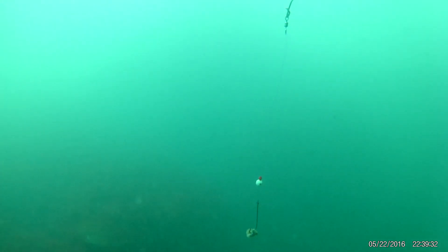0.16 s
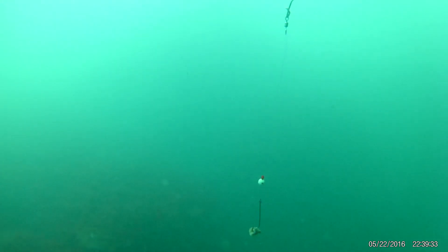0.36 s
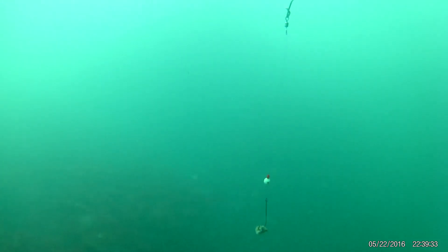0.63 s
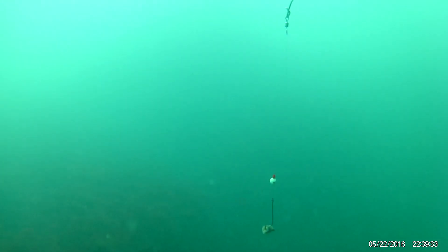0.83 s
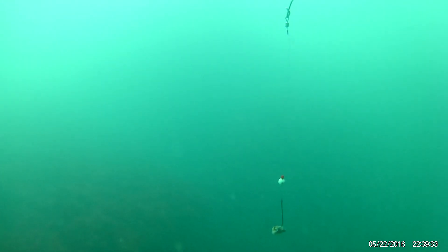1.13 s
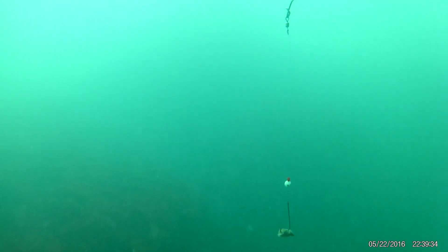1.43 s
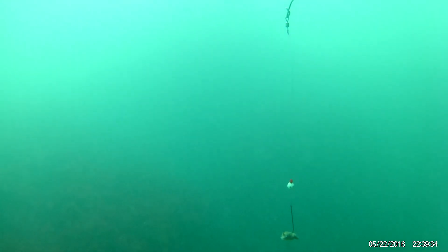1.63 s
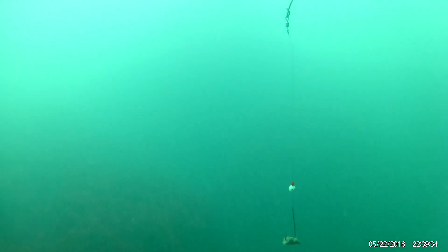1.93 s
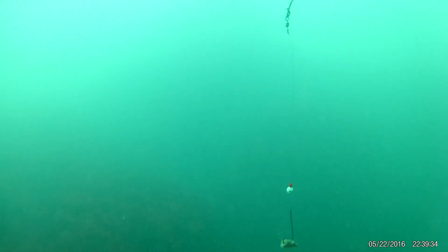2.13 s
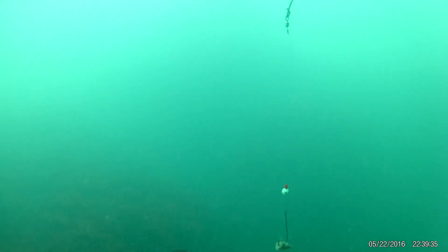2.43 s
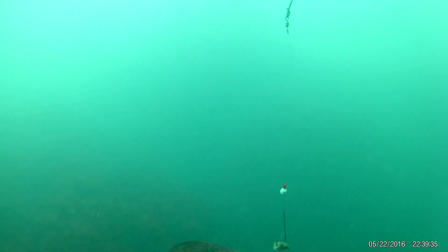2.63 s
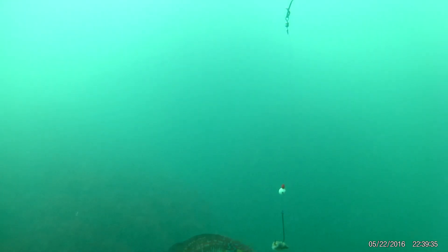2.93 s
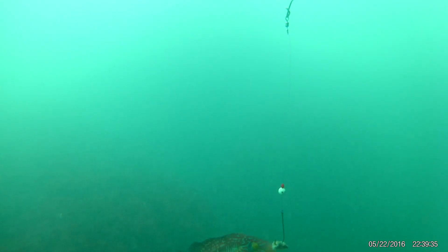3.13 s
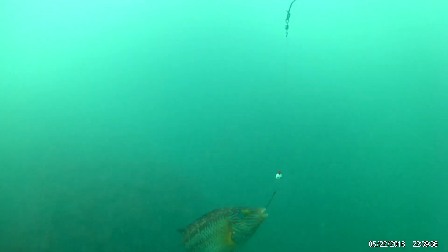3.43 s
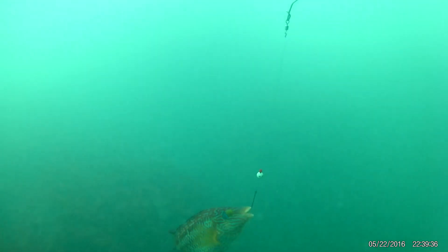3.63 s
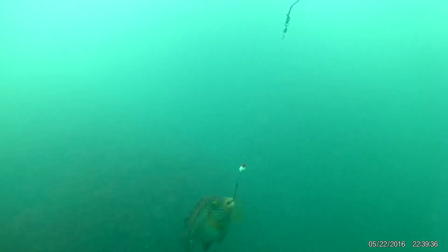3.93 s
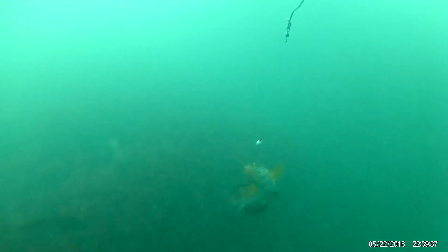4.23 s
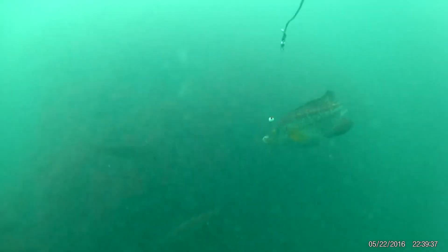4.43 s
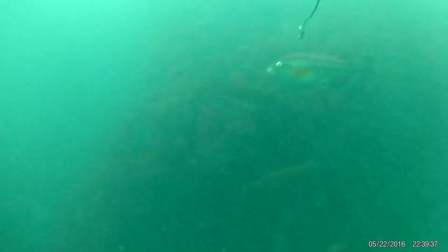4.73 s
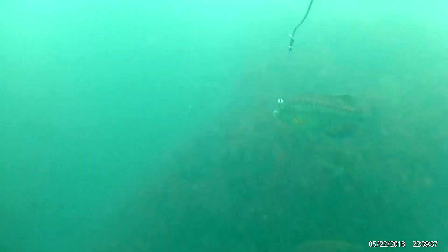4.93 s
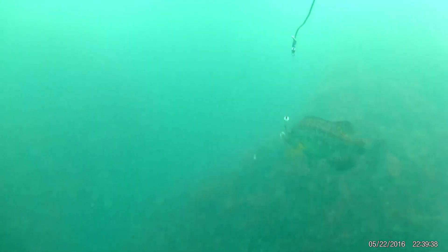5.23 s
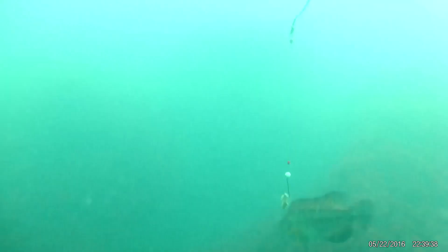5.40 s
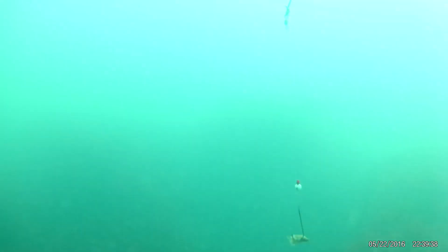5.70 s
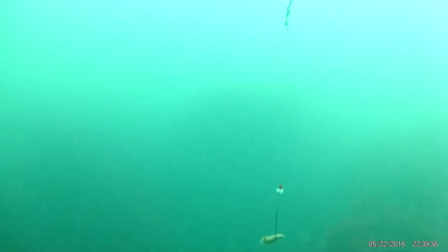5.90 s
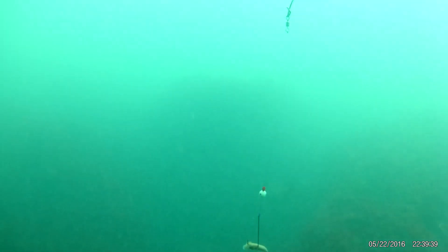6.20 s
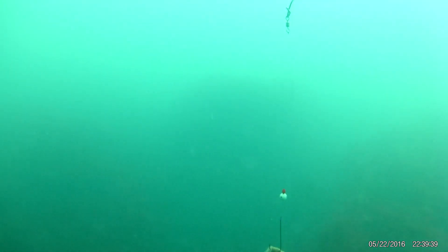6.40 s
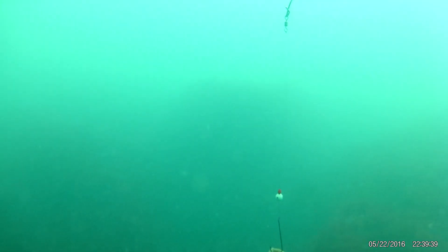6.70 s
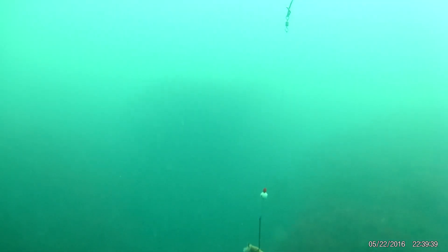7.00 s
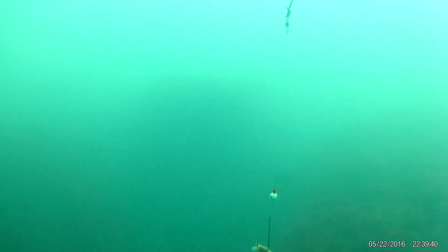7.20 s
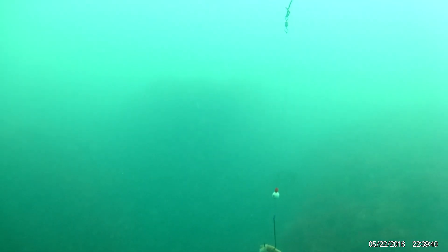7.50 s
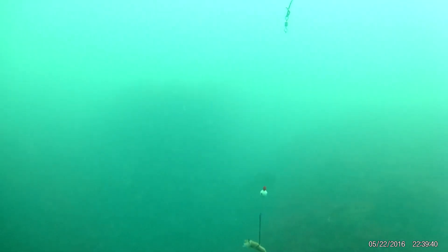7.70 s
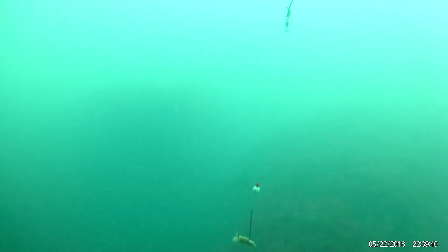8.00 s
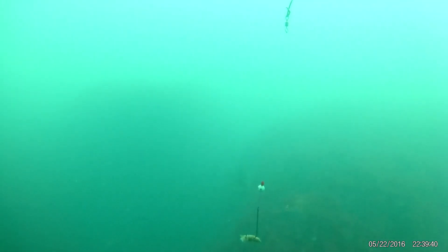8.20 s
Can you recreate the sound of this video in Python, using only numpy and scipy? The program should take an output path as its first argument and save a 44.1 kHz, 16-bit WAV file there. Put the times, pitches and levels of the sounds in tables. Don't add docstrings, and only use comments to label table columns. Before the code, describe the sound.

Steady dull water drone; a fish jerks the line with a loud boomy knock and metallic rattle, then thuds, hollow pops and line squeaks, then calm.

```python
import sys
import numpy as np
from scipy import signal
from scipy.fft import rfft, irfft, next_fast_len
from scipy.io import wavfile
from scipy.ndimage import uniform_filter1d

SR = 44100
rng = np.random.default_rng(int(sys.argv[2]) if len(sys.argv) > 2 else 0)


def invert_db(level):
    return 10 ** (np.asarray(level, dtype=float) / 20)


def digitize_waveform(pressure):
    field = np.atleast_2d(pressure).T
    bounded = np.clip(field, -1, 1)
    quanta = np.round(bounded * 32767).astype(np.int16)
    wavfile.write(sys.argv[1], SR, quanta)


N = 368224

# (frequency [Hz], density [dB per Hz])
WATER_SPECTRUM = [(12, -52), (20, -22.5), (72, -3.5), (94, -7.5), (117, -13), (146, -14), (205, -9.5),
                  (250, -7.5), (439, -7), (534, -2.5), (915, -23), (1090, -35.5), (1290, -25),
                  (1610, -37.5), (7000, -55), (9100, -84.5), (15400, -120)]
# (frequency [Hz], width [Hz], boost [dB])
WATER_BOOSTS = [(76, 25, 2.5), (543.3, 27, 4), (621, 53, 7), (1262, 110, 4.5), (2750, 400, 3.5)]
# (time [s], level [dB])
STIRS = [
    (3.3, 2),
    (4.05, 1.5),
    (4.4, 1.5),
    (4.9, 2),
]
# (time [s], peak [dB], pitch [Hz])
TICKS = [(0.059, -58, 2830), (0.326, -62, 3100), (0.9625, -62, 3200), (1.5373, -52.5, 2750),
         (1.5663, -64, 2580), (2.414, -57.5, 2600), (2.556, -55, 2830), (3.8092, -51.5, 1870),
         (3.915, -47.5, 1890), (5.3712, -64.5, 1873), (5.4106, -57, 2260), (5.6095, -41, 3000),
         (5.7492, -60, 1870), (6.5484, -58, 2850), (6.6094, -51, 1920)]
# (time [s], peak [dB], pitch [Hz])
TAPS = [(0.344, -25, 589), (0.359, -27.5, 601.4), (0.537, -32.5, 538), (1.002, -41, 514),
        (1.136, -32.5, 550), (2.546, -34, 548), (3.77, -45, 628), (5.735, -34, 582), (6.317, -37.5, 608),
        (6.434, -35.5, 527), (7.521, -26, 554), (7.943, -38.5, 602)]
# (time [s], peak [dB], pitch [Hz], t60 [s])
BLIPS = [
    (1.452, -49, 800, 0.1),
    (3.769, -40, 753, 0.089),
    (6.262, -46, 872, 0.1),
    (1.46, -52, 1380, 0.12),
]
# (start [s], hold [s], rattle level [dB], rub level [dB])
PULLS = [(3.235, 0.11, -32, -10.5), (3.372, .045, -50, -26), (4.078, .135, -66, -32),
         (4.24, .055, -58, -40), (4.296, 0.1, -40, -20), (4.4, 0.051, -45.5, -16.5),
         (4.655, .02, -68, -27.5), (4.718, 0.13, -62.5, -21.5), (4.911, 0.047, -68, -28),
         (5.435, 0.028, -77, -32), (5.514, .015, -60.5, -35), (5.598, .02, -59.5, -36.5),
         (5.72, .045, -60, -42), (5.795, 0.016, -61, -45.5), (5.922, .12, -66, -37.5)]
# (frequency [Hz], density [dB per Hz])
RATTLE_SPECTRUM = [(530, -42.5), (900, 1.5), (1700, -9.5), (2360, -9.5), (3100, -13.5), (3480, -18.5),
                   (3830, -14), (4960, -24.5), (6350, -20.5), (7400, -35.5), (7850, -55), (8830, -28.5),
                   (15000, -49)]
# (frequency [Hz], width [Hz], level [dB])
RATTLE_MODES = [(1870, 78, 0), (2267, 270, -0.5), (2877, 100, -1), (3150, 31, -2.5), (3810, 110, -5.5),
                (4476, 90, -2), (4220, 47, -6.5), (4370, 36, -8), (5540, 51, -13.5), (5940, 290, -15.5)]
# (time [s], push level [dB], rig level [dB], housing level [dB], share of full ring time [0-1])
KNOCKS = [(3.236, 3, -5, 3.5, 0.84), (3.253, 2, -10, 1.5, 0.88), (3.284, 2.5, -24.5, -1.5, 0.93),
          (3.896, -24.5, -39, -33, 0.83), (4.302, -6, -23, -16, 0.17), (4.312, -22, -11.5, -12, 0.53),
          (4.321, -26, -15, -11.5, 0.32), (4.333, -5, -44, -12.5, 0.43), (4.377, -6, -21, -18.5, 0.3),
          (4.407, -48, -55, -3, 0.46), (4.427, -11, -26, -10, 0.8), (4.444, -20, -39, -8.5, 0.35),
          (4.653, -18, -37.5, -48, 0.8), (4.667, -8.5, -32, -27, 0.6), (4.675, -12, -17, -40, 0.05),
          (4.723, -19, -42.5, -15.5, 0.73), (4.737, -12, -22.5, -13, 0.34), (4.804, -22, -30.5, -17, 0.99),
          (4.963, -15, -23.5, -34, 0.68), (5.349, -23.5, -61, -46, 0.7), (5.448, -19.5, -27, -27, 0.98)]
# (frequency [Hz], level [dB], t60 [s])
PUSH_MODES = [(51.66, -9.5, 0.68), (79.6, -8, 0.12), (104.2, -5, 0.26)]
# (frequency [Hz], level [dB], t60 [s])
RIG_MODES = [(190.1, -1, 0.32), (233, 7.5, 0.089), (296, 0.5, .12), (370.4, -1, 0.27)]
# (frequency [Hz], level [dB], t60 [s])
HOUSING_MODES = [(545.5, -12.5, 0.23), (610, -5.5, 0.27), (647, -17, 0.093), (723, -22.5, 0.32)]
# (frequency [Hz], level [dB], t60 [s])
LID_MODES = [(809, 3.5, 0.084), (903, -6.5, 0.17), (1020, -5, 0.11), (1198, -4, 0.11), (1414, -6.5, 0.096)]
# (time [s], peak [dB], brightness above 3400 Hz [dB])
STRIKES = [(3.2433, -18, 5.5), (3.2493, -25, 1.5), (3.2627, -16, 11), (3.2852, -17.5, 11),
           (3.3166, -25, 15.5), (3.3361, -21.5, 10), (3.377, -39, 5.5), (3.4343, -48, 2),
           (3.4668, -48.5, 3), (3.304, -29, 8), (4.2564, -50.5, -5.5), (4.3013, -38, -4), (4.35, -40, 7),
           (4.415, -31, 10), (4.3811, -31.5, 13), (4.403, -26.5, 13), (4.4449, -40.5, -11), (4.666, -46, 6),
           (4.722, -41.5, 1.5), (4.7363, -35, 0.1), (4.7732, -51, -9), (4.7996, -43, -11),
           (4.8525, -54, -7), (4.652, -52, 3), (5.3712, -50, 10), (5.4455, -51, -2), (5.5867, -48, 2),
           (5.6096, -47, 12), (5.7498, -43, 2.5), (5.7244, -55, 7)]
# (time [s], rate [Hz], level [dB], loss [dB per s])
SWAYS = [
    (3.38, 48.8, -32.5, 78),
    (4.44, 48.6, -13, 281.5),
    (4.74, 38.4, -26.5, 221.5),
    (4.985, 52.2, -40, 149),
    (5.17, 45.2, -40, 42),
    (5.48, 50, -45, 35),
]
# (start [s], length [s], first rate [slips per s, or Hz of the
# overtone], last rate [same], level [dB])
SLIPS = [
    (4.75, .105, 640, 545, -37),
    (4.835, .125, 435, 300, -22.5),
    (4.078, .148, 95, 101, -47.5),
    (5.045, .15, 203, 192, -32.5),
    (5.14, .22, 146, 124, -43),
    (4.05, .11, 189, 194, -46),
    (4.25, .045, 100, 101, -40),
    (4.79, 0.047, 1110, 1100, -27),
]
# (level [dB], ..)
SLIP_PARTIAL_DB = (1.4, -27, -28)
# (frequency [Hz], width [Hz], boost [dB])
SLIP_BOOSTS = [(610, 140, 21.5), (1300, 800, -21.5), (3400, 1400, -20)]
# (level [dB], ..)
SLIP_CLICK_DB = (-66.5, -67, -64)
# (frequency [Hz], width [Hz], level [dB])
SWIVEL_MODES = [(1890, 140, 8.5), (2280, 180, 8), (2830, 180, -0.5), (3420, 240, -9.5), (3900, 300, -7.5)]
# (time [s], peak [dB], pitch [Hz], t60 [s])
SHOVES = [
    (4.3, -3.5, 98, 0.061),
    (4.331, -4, 60, 0.12),
    (4.651, -11.5, 58.4, 0.063),
    (4.735, -13.5, 56.5, 0.056),
]
# (time [s], peak [dB], pitch [Hz], t60 [s])
POPS = [
    (4.307, -10, 280, 0.079),
    (4.666, -15.5, 203.6, 0.084),
    (4.803, -18, 220, 0.032),
    (4.964, -6, 242, 0.07),
    (7.896, -36.5, 259.5, 0.18),
    (4.316, -27, 1080, 0.12),
    (4.425, -24, 900, 0.08),
]
# (frequency [Hz], density [dB per Hz])
HISS_SPECTRUM = [(3000, -5.5), (8000, -3.5), (12000, -3), (14000, -2.5), (15600, -0.5), (15900, -42)]
# (time [s], ..)
DROPOUTS = [.13, .445, .481, .608, .632, .678, 1.42, 1.632, 1.884, 2.972, 3.084, 3.401, 3.511, 3.719, 4.215,
            4.483, 4.694, 4.919, 5.09, 5.167, 5.709, 5.763, 5.816, 6.242, 6.797, 7.053, 7.18, 7.309, 7.757,
            8.325]

SLIP_RELEASE_DB_PER_S = 1499


def rms_one(x):
    return x / np.sqrt(np.mean(x ** 2) + 1e-20)


def drift(rate):
    hop = 40
    r = np.exp(-2 * np.pi * rate * hop / SR)
    noise = rng.standard_normal(N // hop + 2002)
    slow = signal.lfilter([1], [1, -2 * r, r * r], noise)[2000:]
    return np.interp(np.arange(N) / hop, np.arange(len(slow)), rms_one(slow))


def shaped(x, spectrum, peaks=()):
    size = next_fast_len(N)
    hz = np.maximum(np.arange(size // 2 + 1) * SR / size, 1)
    corner_hz, corner_db = np.transpose(spectrum)
    level_db = np.interp(np.log(hz), np.log(corner_hz), corner_db)
    for top_hz, width, boost_db in peaks:
        level_db = level_db + resonant_boost(hz, top_hz, width, boost_db)
    return rms_one(irfft(rfft(x, size) * invert_db(level_db), size)[:N])


def resonant_boost(hz, top_hz, width, boost_db):
    return boost_db / (1 + (2 * (hz - top_hz) / width) ** 2)


def filtered(x, order, hz, kind):
    return signal.sosfiltfilt(signal.butter(order, hz, kind, fs=SR, output="sos"), x)


def resonate(x, hz, width):
    r = np.exp(-np.pi * width / SR)
    feedback = [1, -2 * r * np.cos(2 * np.pi * hz / SR), r * r]
    return signal.lfilter(np.array([1, 0, -1]) * (1 - r * r) / 2, feedback, x)


def ringing(hz, t60, contact_s):
    t = np.arange(round(1.3 * t60 * SR)) / SR
    onset = (1 - np.exp(-t / contact_s)) ** 2
    return -np.sin(2 * np.pi * hz * t) * invert_db(-60 * t / t60) * onset


def add(out, s, sound):
    i = round(s * SR)
    out[i:i + len(sound)] += sound[:N - i]


def single_rings(events):
    out = np.zeros(N)
    for s, peak_db, hz, t60 in events:
        add(out, s, invert_db(peak_db) * ringing(hz, t60, contact_s=0.0016))
    return out


def held(start, hold, attack, sag_db, release_db):
    out = np.zeros(N)
    end = min(round((start + hold + 60 / release_db) * SR), N)
    span = slice(round(start * SR), end)
    t = np.arange(span.stop - span.start) / SR
    loss_db = sag_db * np.minimum(t, hold) + release_db * np.maximum(t - hold, 0)
    out[span] = np.minimum(t / attack, 1) * invert_db(-loss_db)
    return out


def unsteady(gate, hz, partial_db, wobble, shake_db):
    out, live = np.zeros(N), gate > 0
    phase = 2 * np.pi * np.cumsum((hz * (1 + wobble * drift(36)))[live]) / SR
    for k, level_db in enumerate(partial_db, 1):
        strength = invert_db((level_db + shake_db * drift(35))[live])
        out[live] += strength * np.sin(k * phase)
    return np.sqrt(2) * gate * out


def water():
    still_db, rise_s, settle_s = -44.0, 0.21, 0.35
    noise = shaped(rng.standard_normal(N), WATER_SPECTRUM, WATER_BOOSTS)
    bass = filtered(noise, 2, 160, "low")
    hiss = filtered(noise, 2, 1000, "high")
    hum = noise - bass - hiss
    out = 0
    for part, swell_db in ((bass, 1.5), (hum, 1.3), (hiss, 0.8)):
        out = out + part * invert_db(swell_db * (drift(2.2) + drift(4.9)))
    level_db = still_db
    for s, stir_db in STIRS:
        since = np.maximum(np.arange(N) / SR - s, 0)
        level_db = level_db + 2 * stir_db * (1 - np.exp(-since / rise_s)) * np.exp(-since / settle_s)
    return invert_db(level_db) * rms_one(out)


def swivel_ticks():
    out = np.zeros(N)
    t = np.arange(900) / SR
    for s, peak_db, hz in TICKS:
        burst = rng.standard_normal(len(t)) * invert_db(-60 * t / 0.037)
        add(out, s, invert_db(peak_db + 13.5) * resonate(resonate(burst, hz, 450), hz, 450))
    return out


def housing_taps():
    out = np.zeros(N)
    for s, peak_db, hz in TAPS:
        add(out, s, invert_db(peak_db) * ringing(hz, 0.13, contact_s=0.0022))
    return out


def bubble_blips():
    return single_rings(BLIPS)


def swivel_rattle():
    sizes = invert_db(3.2 * np.minimum(rng.exponential(1, N), 4)) * rng.choice([-1, 1], N)
    clicks = sizes * (rng.random(N) < 3000 * invert_db(5 * drift(60)) / SR)
    dealt = rng.integers(0, 3, N)
    rings = 0
    for k, (hz, width, level_db) in enumerate(RATTLE_MODES):
        own_clicks = clicks * (dealt == k % 3) + 1e-18
        rings = rings + invert_db(level_db) * rms_one(resonate(own_clicks, hz, 1.212 * width))
    return rms_one(shaped(clicks, RATTLE_SPECTRUM) + invert_db(5.0) * shaped(rings, RATTLE_SPECTRUM))


def pulls(rattle):
    attack_s, sag_db_per_s = 0.008, 38.5
    rough = rng.standard_normal(N)
    rub = rms_one(0.7 * resonate(rough, 546, 33) - resonate(rough, 606.6, 22))
    out = np.zeros(N)
    for s, hold, rattle_db, rub_db in PULLS:
        out += invert_db(rattle_db - 5) * held(s, hold, attack_s, sag_db_per_s, 900) * rattle
        out += invert_db(rub_db - 8) * held(s, hold, attack_s, sag_db_per_s, 351) * rub
    return out


def knocks():
    out = np.zeros(N)
    groups = ((PUSH_MODES, 0.0015), (RIG_MODES, 0.001), (HOUSING_MODES, 0.001), (LID_MODES, 0.0008))
    for s, push_db, rig_db, housing_db, share in KNOCKS:
        lid_db = housing_db - 4.0 - 21.0 * share
        for (modes, contact_s), blow_db in zip(groups, (push_db, rig_db, housing_db, lid_db)):
            for hz, mode_db, t60 in modes:
                ring = ringing(hz, t60 * np.clip(share, 0.05, 1.5), contact_s)
                chance_db = 1.5 * rng.standard_normal()
                add(out, s, invert_db(blow_db + mode_db - 3 + chance_db) * ring)
    return out


def strikes(rattle):
    bright = filtered(rattle, 4, 3400, "high")
    out, t = np.zeros(N), np.arange(round(0.15 * SR)) / SR
    for s, peak_db, bright_db in STRIKES:
        t60 = max(0.08 - 0.01 * bright_db, 0.02)
        start = round(s * SR)
        span = slice(start, start + len(t))
        flare = invert_db(peak_db - 7 - 60 * t / t60) * (1 - np.exp(-t / 0.0015))
        even = np.sqrt(np.sum(flare ** 2) / np.sum((flare * rattle[span]) ** 2))
        add(out, s, even * flare * (rattle[span] + (invert_db(bright_db) - 1) * bright[span]))
    return out


def swaying():
    out = np.zeros(N)
    for s, hz, level_db, loss_db in SWAYS:
        gate = held(s, 0.45, 0.011, loss_db, 600)
        out += unsteady(gate, hz, [level_db], wobble=0.025, shake_db=4.5)
    return out


def slip_rate(start, length, first_hz, last_hz):
    left = np.clip(1 - (np.arange(N) / SR - start) / length, 0, 1)
    return last_hz + (first_hz - last_hz) * left ** 1.8


def line_squeaks():
    out = np.zeros(N)
    for start, length, first_hz, last_hz, level_db in SLIPS:
        hz = slip_rate(start, length, first_hz, last_hz)
        partial_db = []
        for k, own_db in enumerate(SLIP_PARTIAL_DB, 1):
            boost_db = sum(resonant_boost(k * hz, *boost) for boost in SLIP_BOOSTS)
            partial_db.append(level_db + own_db + boost_db)
        partial_db[0] = partial_db[0] + 30.5 * np.log2(hz / first_hz)
        gate = held(start, length, 0.023, 0, SLIP_RELEASE_DB_PER_S)
        out += unsteady(gate, hz, partial_db, wobble=0.014, shake_db=4.5)
    return out


def slip_clicks():
    scratch_s = 0.005
    out = np.zeros(N)
    for (start, length, first_hz, last_hz, _), level_db in zip(SLIPS, SLIP_CLICK_DB):
        hz = slip_rate(start, length, first_hz, last_hz)
        cycles = np.cumsum(hz * (1 + 0.022 * drift(66))) / SR
        clicks = np.diff(np.floor(cycles), prepend=0) * invert_db(2.3 * rng.standard_normal(N))
        decay = signal.lfilter([1], [1, -np.exp(-1 / (scratch_s * SR))], clicks)
        scratch = decay * rng.standard_normal(N)
        rings = 0
        for mode_hz, width, mode_db in SWIVEL_MODES:
            ring = resonate(resonate(scratch, mode_hz, width), mode_hz, 2 * width)
            rings = rings + invert_db(mode_db) * ring
        gate = held(start, length, 0.008, 5, SLIP_RELEASE_DB_PER_S)
        loudness = np.sqrt(np.mean(rings[gate > 0.5] ** 2))
        out += gate * invert_db(level_db + 2.2 * drift(25)) * rings / loudness
    return out


def water_shoves():
    return single_rings(SHOVES)


def pops_and_lid_rings():
    return single_rings(POPS)


def scene():
    rattle = swivel_rattle()
    around = water() + swivel_ticks() + housing_taps() + bubble_blips()
    jerking = pulls(rattle) + knocks() + strikes(rattle) + swaying()
    slipping = line_squeaks() + slip_clicks()
    return (around + jerking + slipping + water_shoves() + pops_and_lid_rings())[None]


def thinned_treble(x):
    length_s, fade_s = 0.014, 0.016
    treble = filtered(x[0], 4, 2300, "high")
    out = x.copy()
    for s in DROPOUTS:
        reach = (length_s + fade_s) / 2
        span = slice(round((s - reach) * SR), round((s + reach) * SR))
        size = len(treble[span])
        lines = rfft(treble[span] * signal.windows.tukey(size, fade_s / (length_s + fade_s)))
        prominence = abs(lines) / uniform_filter1d(abs(lines), size=40)
        hz = np.linspace(0, SR / 2, len(lines))
        weak = prominence < np.interp(hz, [2500, 6000], [1.3, 2.3])
        out[0, span] -= 0.88 * irfft(lines * weak, size)
    return out


def top_cut(x):
    return signal.sosfilt(signal.butter(12, 16970, fs=SR, output="sos"), x)


def record(dry):
    rounding = signal.butter(2, 9000, fs=SR, output="sos")
    overloaded = signal.sosfilt(rounding, np.clip(dry, -0.98, 0.98))
    hiss = invert_db(-81) * shaped(rng.standard_normal(N), HISS_SPECTRUM)
    mix = thinned_treble(overloaded + hiss)
    return top_cut(mix)


dry = scene()
out = record(dry)
digitize_waveform(out)
```